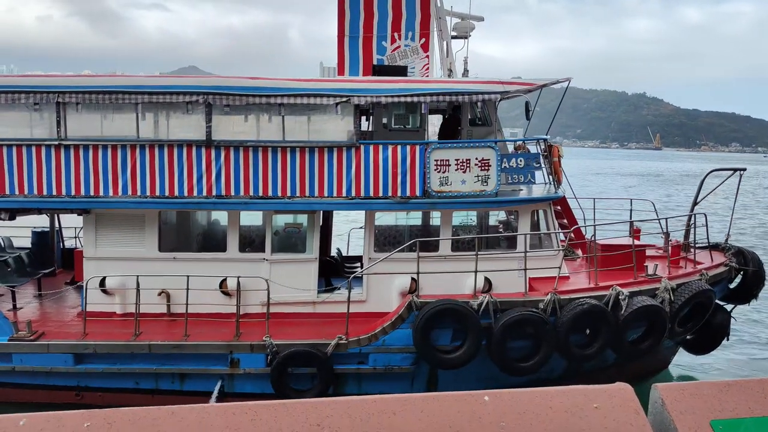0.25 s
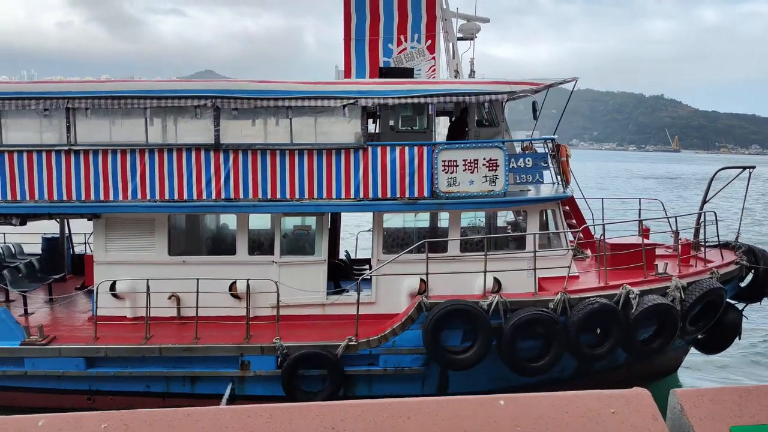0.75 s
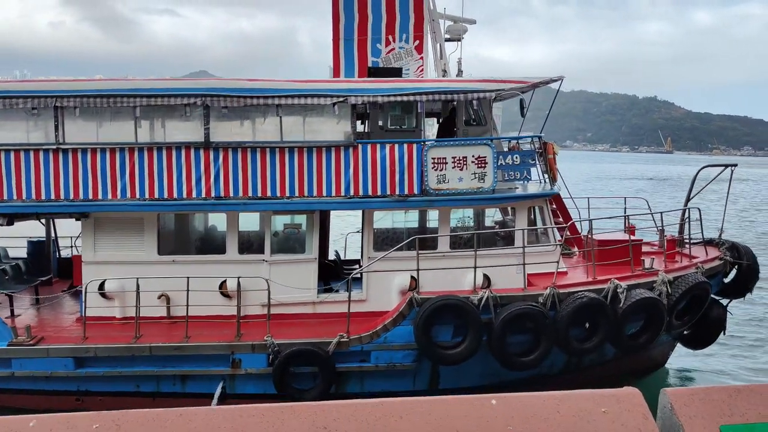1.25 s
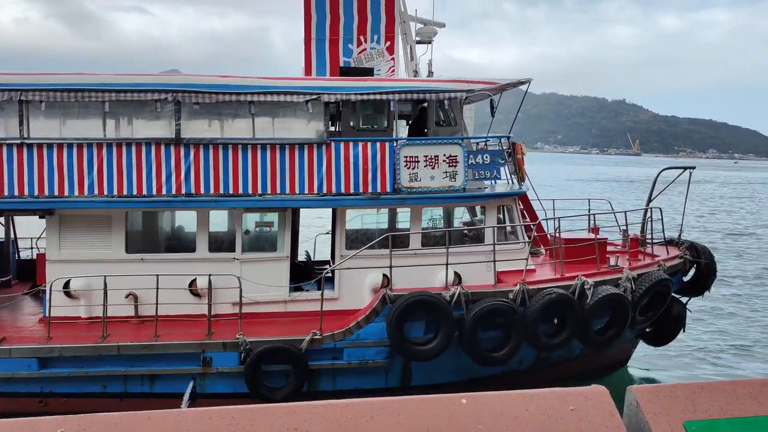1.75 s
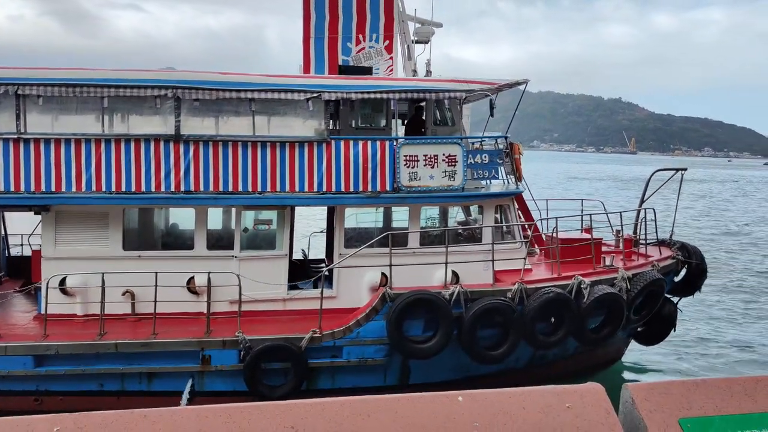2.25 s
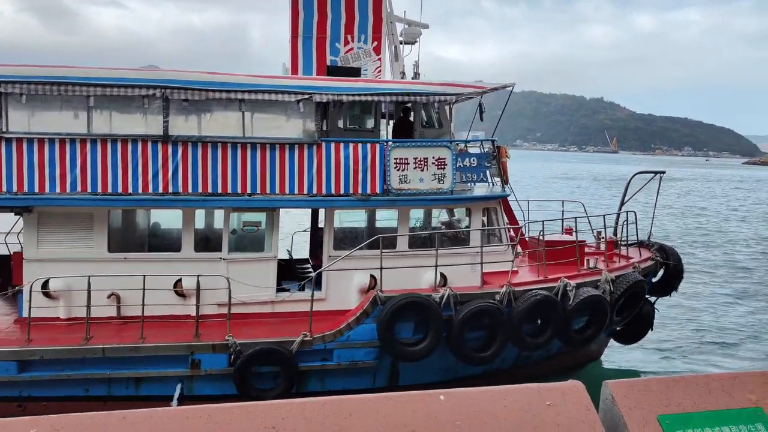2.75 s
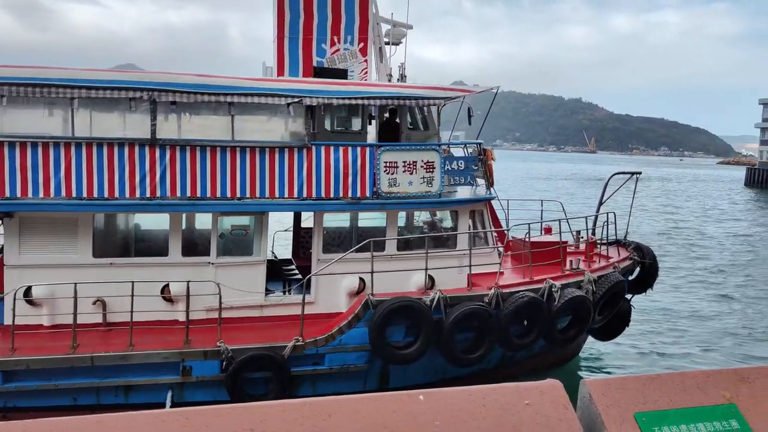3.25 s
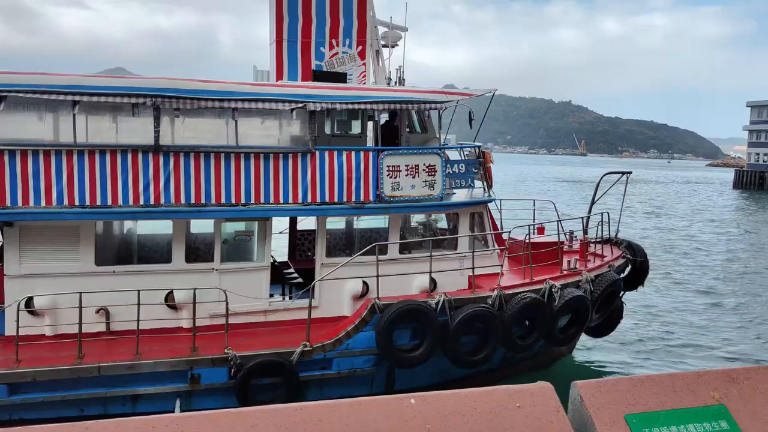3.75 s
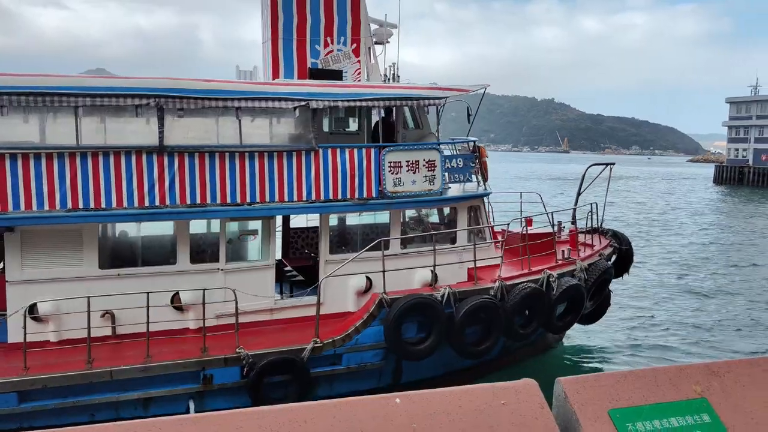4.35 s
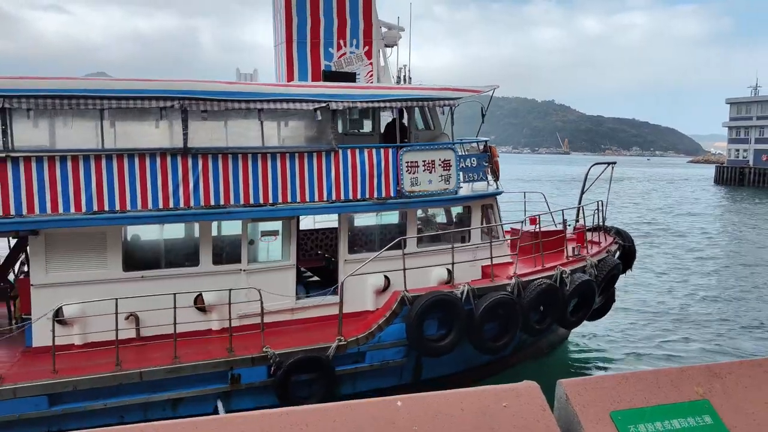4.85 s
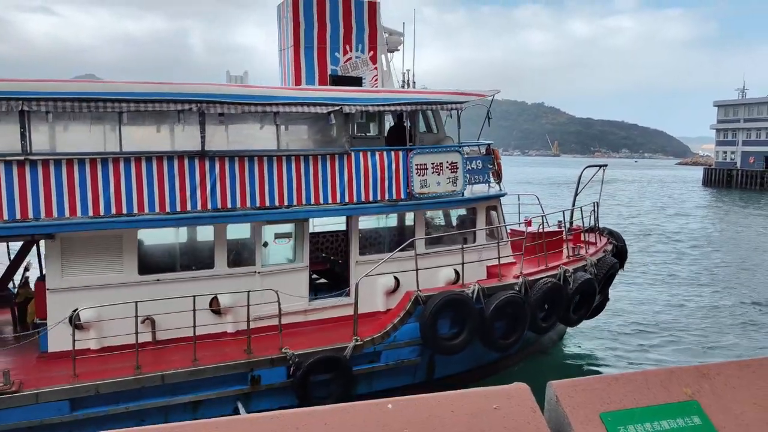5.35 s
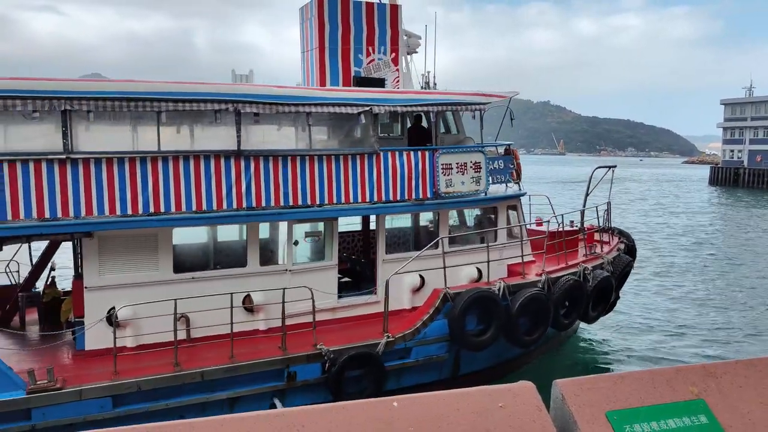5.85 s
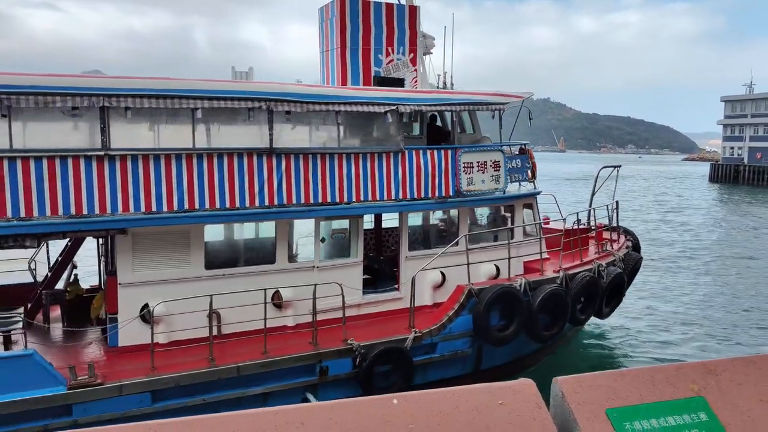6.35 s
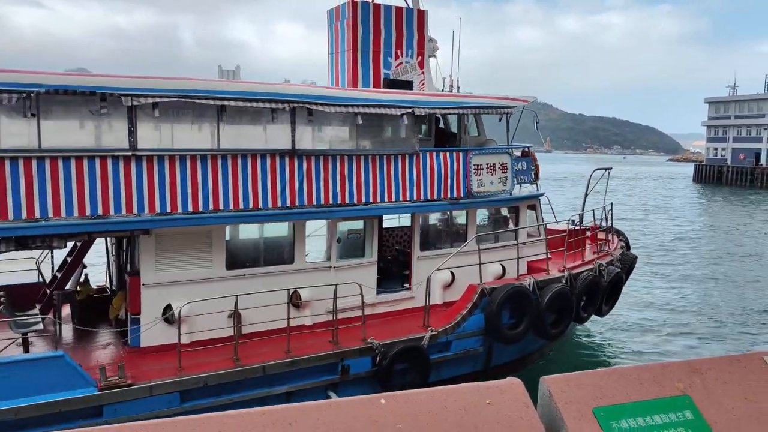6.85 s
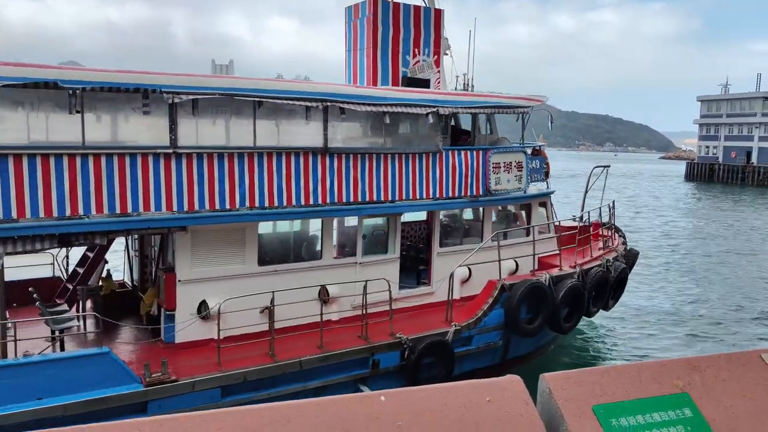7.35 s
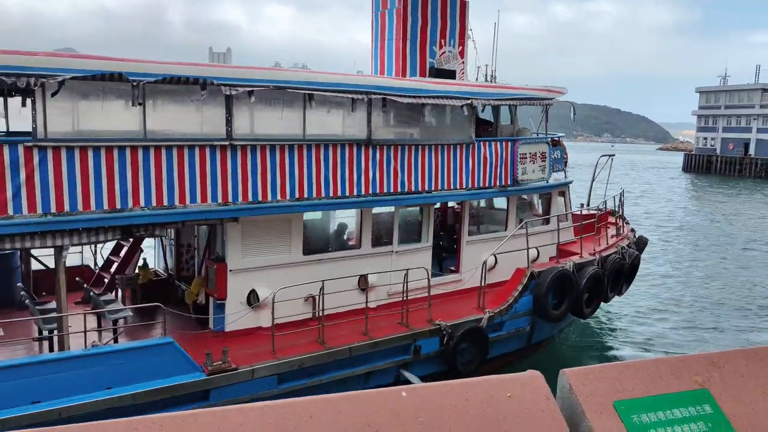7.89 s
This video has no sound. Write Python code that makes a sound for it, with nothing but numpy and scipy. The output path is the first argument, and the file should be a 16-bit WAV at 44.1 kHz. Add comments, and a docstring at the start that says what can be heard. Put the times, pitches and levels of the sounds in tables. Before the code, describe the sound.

Low, bassy boat-engine rumble with an uneven chugging pulse, speeding up a little as it leaves the quay, with faint water hiss and bubbling.

```python
"""A six-cylinder ferry diesel throbs and speeds up as the boat backs off a pier, heard from a phone on the
quay. Firing tones and weaker tones of unequal cylinders are sines locked to the crank; the generator hum and a
passing drone are wavering sines. Hull rumble, engine-room roar and water hiss are noise shaped in bands.
Bubbles and hollow rings are decaying sines that glide up; splashes are short bursts of filtered noise."""
import sys
import numpy as np
from scipy import signal
from scipy.fft import rfft, irfft, next_fast_len
from scipy.io import wavfile
from scipy.ndimage import uniform_filter1d

SR = 44100
rng = np.random.default_rng(int(sys.argv[2]) if len(sys.argv) > 2 else 0)


def unload_audio(sound):
    """Save the sound as a 16-bit wav file, at the path given as the first command line argument."""
    columns = np.transpose(np.atleast_2d(sound))
    # keep every value between -1 and 1, then stretch to whole-number steps
    steps = np.round(np.clip(columns, -1, 1) * 32767)
    wavfile.write(sys.argv[1], SR, steps.astype(np.int16))


N = 358091
T = np.arange(N) / SR

# Engine speed. Each row: time in seconds, firing rate in Hz.
FIRING_RATE = [(0, 60.9), (.8, 61.15), (1.3, 60.8), (2.5, 61.2), (2.95, 61.2), (3.2, 62.2), (3.55, 65.0),
               (3.85, 65.2), (4.6, 66.4), (4.95, 67.3), (5.4, 67.1), (5.95, 63.9), (6.55, 63.9),
               (7.2, 66.6), (7.8, 67.8), (8.12, 67.9)]
# Firing tones. Each row: time in seconds, firing tone in dB, then swell in dB of its
# 2nd and 3rd multiples together, its 4th, its 5th and its 6th.
FIRING_LEVELS = [(0, -17, 0.5, -10, -10.5, -14), (1, -19.5, 2, 3, -2.5, -4.5),
                 (1.5, -16.5, -2, -0.5, -18, -11.5), (2, -18, -4, 0, 1, -14.5),
                 (2.5, -18.5, 2.5, -3, 11, -8), (3.1, -19.5, -1.5, 4, -4, -7.5),
                 (3.5, -18.5, 0.5, 12, -10.5, 11.5), (4.1, -19.5, 3.5, -12.5, -11.5, -4),
                 (4.6, -17.5, 4, -2.5, -21, -3), (4.9, -23, 6.5, 12, -23, 19.5),
                 (5.2, -17.5, -7, 1, -16, 3), (5.6, -19.5, -2.5, -1, -19, 0.5),
                 (5.9, -19, 3.5, 4.5, 5.5, -19), (6.5, -17, 1, 11, -20, -11), (7.2, -16, -3, -3, -9.5, -13),
                 (7.7, -17.5, -8.5, 3.5, -11, -6), (8.12, -18, 6.5, 4, -8, 7)]
# Exhaust pipe resonances, one near each firing multiple from the 2nd up.
# Each row: centre in Hz, width in Hz, level in dB of the multiple at the centre.
PIPE_RESONANCES = [(118.85, 15.24, -23), (185.93, 14.5, -28.5), (241, 27, -40.5), (315.2, 16, -46),
                   (366, 24, -45)]
# Firing rates in Hz at which the speed-dependent settings below are given.
RATE_POINTS_HZ = [62, 64.9, 66.3]
# Lean of the firing pulse in rad, and scatter of the firing tone in dB, at each rate point.
LEAN_RAD, SCATTER_DB = [0.65, 1.6, 0.1], [1.5, 0.3, 0.25]
# Power by which the lean grows from multiple to multiple, at each rate point.
LEAN_POWER = [1.6, .8, 1]
# Tones of unequal cylinders, as multiples of the four-stroke cycle rate.
UNEVEN_ORDERS = [3, 4, 5, 7, 9, 11, 13, 15, 16, 17, 19, 20, 21, 22, 23, 25, 27, 28, 29, 33, 38, 40, 43]
# One row for each of those multiples: base level in dB at each rate point.
UNEVEN_LEVELS_DB = [(-37, -36, -35), (-50, -46, -50), (-50, -47, -46), (-46, -42, -43), (-49, -48, -49),
                    (-47, -38.5, -42), (-55, -47, -50), (-41, -50, -41), (-48, -44, -31.5),
                    (-52, -45, -44.5), (-46, -49, -47), (-58, -55, -53), (-53, -41, -39), (-60, -46, -42),
                    (-57, -53, -43), (-54, -58, -60), (-58, -49, -48), (-60, -56, -54), (-62, -58, -52),
                    (-58, -54, -52), (-56.5, -58, -53.5), (-55.5, -55, -57), (-56.5, -57, -59)]
# Swell of those tones. Each row: time in seconds, swell in dB.
BARK_SWELL = [(0, -0.5), (1.4, -0.5), (2.1, -0.5), (2.8, -2.5), (3.5, 0), (4.3, 0), (5, 3), (5.55, -1.5),
              (6.2, 3.5), (7.05, -4), (7.2, -1.5), (8.12, 1)]
# How far the barking tones stray out of step. Each row: time in seconds, spread in rad.
BARK_LOOSENESS = [(0, .9), (7.05, .9), (7.25, .15), (8.12, .15)]
# Generator hum. Each row: time in seconds, level in dB.
GENERATOR_LEVEL = [(0, -38), (1.3, -32), (2.1, -35), (3.3, -46), (4.6, -38), (5.2, -45), (6, -40), (7, -44),
                   (8.12, -43)]
# Hull rumble over time. Each row: time in seconds, level in dB.
RUMBLE_LEVEL = [(0, -46), (1.7, -46.5), (2.6, -42.5), (4.3, -40), (5.2, -38), (5.8, -40.5), (6.5, -41),
                (7.2, -44.5), (8.12, -41)]
# Churned water. Each row: time in seconds, hiss level in dB.
CHURN_LEVEL = [(0, -54), (.75, -54), (1.3, -57), (2.3, -54.5), (2.8, -55.5), (3.2, -54.5), (3.65, -50.5),
               (3.9, -53.5), (4.5, -53), (5.0, -47), (5.2, -50), (5.6, -47), (5.9, -50), (7.5, -55),
               (7.85, -53), (8.12, -53.5)]
# Noise spectra. Each row: frequency in Hz, relative density in dB per Hz.
RUMBLE_SHAPE = [(18, -18), (30, -3), (60, 6), (100, -7.5), (150, -8), (220, -9), (300, -10.5), (400, -10.5),
                (500, -12.5), (620, -20), (850, -34)]
ROAR_SHAPE = [(450, -3), (620, -3), (900, 0), (1150, -5.5), (1500, -13.5), (1900, -20), (2400, -51)]
HISS_SHAPE = [(1300, 2.5), (1900, -6), (2600, 0), (3200, -3.5), (3900, -4.5), (5300, -7), (6700, -9.5),
              (9000, -7.5), (11000, -5.5), (13000, -25.5)]
# Two microphone ports. Each row: frequency in Hz, likeness from 0 to 1, left minus right in dB, left lead in rad.
PORTS = [(60, 0.75, 0, 0.065), (230, 1, 0, 0.18), (348, 0.97, -1, 0.5), (444, 0.72, -1.5, 0.8),
         (874, 0.3, 0, 2.4), (1440, 0.45, -.5, 3.9), (2640, 0.3, 1.5, 6.9), (4530, 0.3, 3, 10),
         (7060, 0, 17, 12.), (8800, 0.25, -5, 12.5)]
# Sharp splashes. Each row: start in seconds, level in dB before filtering, left minus right in dB.
SPLASHES = [(.669, -41, 2), (1.15, -39, 17), (2.1167, -36, 7), (2.5202, -43, 8), (3.7943, -44, -7),
            (5.4886, -44, 9), (6.70, -34, -1)]
# A tone that swells for a while: start in seconds, end in seconds, pitch in Hz, level in dB.
DRONE = (2.5, 3, 375.5, -42.5)
# Hollow rings that sound briefly. Each row: start in seconds, peak in dB, starting pitch in Hz, decay in
# seconds, left minus right in dB.
HOLLOW_RINGS = [(2.915, -38.5, 372.5, 0.043, 4), (3.01, -44, 373, 0.014, 6), (3.059, -35, 258, 0.072, 5),
                (3.085, -45, 364, 0.031, -2), (3.165, -35, 373, 0.067, 3), (4.216, -28, 432, 0.013, -4),
                (5.003, -35, 415, 0.019, 3)]

CYLINDERS, CRANK_START_RAD = 6, -1.1
BARK_LAG_RAD, BARK_FROM_ORDER = 1.12, 10  # crank angle the bark trails by, lowest multiple in it
GENERATOR_HZ = 77.2
ROAR_DB, ROAR_DB_PER_CHURN_DB = -52, 0.24
SHELF_HZ, SHELF_DB, TOP_HZ = 7074, -20.5, 13500


def undb(db):
    """Gain of a level in dB."""
    return 10 ** (np.asarray(db) / 20)


def curves(table):
    """Columns of a table, after its time column, as values per sample."""
    s, *columns = np.transpose(table)
    return [np.interp(T, s, column) for column in columns]


def walk(rate):
    """Smooth random drift with about rate turns a second and spread near 1."""
    knots = rng.standard_normal(int(N / SR * 100) + 50)
    width = max(int(100 / rate), 1)
    slow = uniform_filter1d(uniform_filter1d(knots, width), width)
    return np.interp(T * 100, np.arange(len(slow)), slow / slow.std())


def pair(x, pan_db):
    """Sound on both channels, left minus right by pan_db."""
    return x * undb(np.array([[.5], [-.5]]) * pan_db)


def noise(shape, ref_hz, swell_db, flicker_db, flicker_rate):
    """Half-octave bands at both ports; they swell together and flicker alone; rms 1 above ref_hz before that."""
    size = next_fast_len(N)
    hz = np.maximum(np.arange(size // 2 + 1) * SR / size, 1)

    def on_hz(table, column):
        rows = np.array(table)
        return np.interp(np.log(hz), np.log(rows[:, 0]), rows[:, column])

    near, far = (rfft(rng.standard_normal(size)) * undb(on_hz(shape, 1)) for _ in range(2))
    alike = np.clip(on_hz(PORTS, 1), 0, 1)
    right = alike * near * np.exp(-1j * on_hz(PORTS, 3)) + np.sqrt(1 - alike ** 2) * far
    both = pair(np.array([near, right]), on_hz(PORTS, 2))
    power = np.sum(abs(both.mean(0)[hz > ref_hz]) ** 2) * 2
    both = both / np.sqrt(power) * size
    out, swell, half_octave = 0, walk(32.0), 2 * np.log2(hz)
    for k in range(int(2 * np.log2(shape[0][0])), int(2 * np.log2(shape[-1][0])) + 2):
        band = np.cos(np.pi / 2 * np.clip(half_octave - k, -1, 1)) ** 2
        gain = undb(swell_db * swell + flicker_db * walk(flicker_rate))
        out = out + irfft(both * band, size)[:, :N] * gain
    return out


def crank():
    """Angle in rad of the four-stroke cycle, in which every cylinder fires once."""
    return 2 * np.pi * np.cumsum(curves(FIRING_RATE)[0]) / SR / CYLINDERS + CRANK_START_RAD


def firing_tones(firing_hz, cycle):
    """Multiples of the firing rate keep near step to form a pulse; combustion scatter wavers size and phase."""
    tone_db, *swell_db = curves(FIRING_LEVELS)
    levels_db = [tone_db]
    for k, (mid_hz, width_hz, db) in enumerate(PIPE_RESONANCES):
        # a multiple fades as speed carries it off its pipe resonance
        detune = 2 * ((k + 2) * firing_hz - mid_hz) / width_hz
        levels_db.append(db + swell_db[max(k - 1, 0)] - 20 * np.log10(1 + detune ** 2))
    lean = np.interp(firing_hz, RATE_POINTS_HZ, LEAN_RAD) + .2 * walk(1.5)
    power = np.interp(firing_hz, RATE_POINTS_HZ, LEAN_POWER)
    scatter_db = np.interp(firing_hz, RATE_POINTS_HZ, SCATTER_DB) * walk(22.0)
    out = 0
    for k, db in enumerate(levels_db):
        waver_db = (.9 + .2 * k) * walk(4.0) + max(k - 2, 0) * .6 * walk(12.0)
        if k == 0:
            waver_db = waver_db + scatter_db
        phase = (k + 1) * CYLINDERS * cycle - lean * k ** power + (.15 + .06 * k) * walk(2.8)
        out = out + undb(db + waver_db) * np.cos(phase)
    return out


def uneven_tones(firing_hz, cycle):
    """One cylinder barks harder, so tones between throb once a cycle, sharply where they keep step."""
    bark_db, loose_rad = curves(BARK_SWELL)[0], curves(BARK_LOOSENESS)[0]
    out = 0
    for order, levels_db in zip(UNEVEN_ORDERS, UNEVEN_LEVELS_DB):
        db = bark_db + np.interp(firing_hz, RATE_POINTS_HZ, levels_db) + 1.4 * walk(3.5)
        in_bark = order >= BARK_FROM_ORDER
        stray = (loose_rad if in_bark else .3) * walk(.8)
        out = out + undb(db) * np.cos(order * (cycle - BARK_LAG_RAD * in_bark) + stray)
    return out


def diesel():
    """Crank-locked tones; the left port hears them later and the bearing wavers as the boat turns."""
    firing_hz = curves(FIRING_RATE)[0]
    cycle = crank() + 0.036 * walk(1.8)
    tones = np.sqrt(2) * (firing_tones(firing_hz, cycle) + uneven_tones(firing_hz, cycle))
    lag_samples = np.clip(13 + 4 * walk(1.2), 0, None)
    tilt = undb(.15 * walk(1.3))
    left = np.interp(np.arange(N) - lag_samples, np.arange(N), tones)
    return np.array([tilt * left, tones / tilt])


def generator():
    """A hum independent of the main engine: one sine wavering in pitch and level."""
    phase = 2 * np.pi * np.cumsum(GENERATOR_HZ + 0.68 * walk(0.61)) / SR
    level_db = curves(GENERATOR_LEVEL)[0] + 2.7 * walk(0.63)
    return pair(np.sqrt(2) * undb(level_db) * np.sin(phase), 0)


def wash():
    """Hull rumble, engine-room roar and hiss of churned water; the roar swells as the propeller bites."""
    churn_db = curves(CHURN_LEVEL)[0]
    roar_db = ROAR_DB + ROAR_DB_PER_CHURN_DB * (churn_db - churn_db.mean())
    rumble = undb(curves(RUMBLE_LEVEL)[0]) * noise(RUMBLE_SHAPE, 280, 0.2, 1.8, 14.0)
    roar = undb(roar_db) * noise(ROAR_SHAPE, 650, 0.5, 1.8, 18.0)
    hiss = undb(churn_db) * noise(HISS_SHAPE, 2400, 0.8, 1.1, 22.0)
    # rumble and roar puff with every firing and throb once a cycle
    puff = 1 + np.clip(.14 + .15 * walk(15.0), 0, 1) * np.cos(CYLINDERS * crank())
    throb = 1 + .07 * np.cos(crank() - BARK_LAG_RAD)
    return puff * throb * (rumble + roar) + hiss


def bubbles(count, level_db):
    """Bubbles burst at random in the wake, louder with churn; each decays over some twenty cycles, gliding up."""
    out, t = np.zeros((2, N + SR)), np.arange(SR // 8) / SR
    churn_db = curves(CHURN_LEVEL)[0]
    for when, pitch, size, side in rng.random((count, 4)):
        i, hz = int(when * N), 650.0 * 11.0 ** pitch
        envelope = np.exp(-t * hz / 22.0) * (1 - np.exp(-t / 0.0029))
        ring = envelope * np.sin(2 * np.pi * hz * t * (1 + 1.3 * t))
        db = churn_db[i] + level_db - 2.2 * np.log(size + .02)
        out[:, i:i + len(t)] += pair(undb(db) * ring, 16 * side - 6)
    return out[:, :N]


def splashes():
    """Short bursts of spray: band-passed noise that dies in milliseconds, separate at each port."""
    out, t = np.zeros((2, N + SR)), np.arange(SR // 5) / SR
    spray = signal.butter(2, [900, 3400], "bandpass", fs=SR, output="sos")
    for s, db, pan_db in SPLASHES:
        grit = rng.standard_normal((2, len(t)))
        burst = signal.sosfilt(spray, grit) * np.exp(-t / 0.0044)
        i = int(s * SR)
        out[:, i:i + len(t)] += pair(undb(db), pan_db) * burst
    return out[:, :N]


def drone():
    """A tone swells in and fades, wavering in level and phase."""
    start_s, end_s, hz, db = DRONE
    swell = np.clip(np.minimum(T - start_s, end_s - T) / 0.054 + .5, 0, 1)
    tone = np.sin(2 * np.pi * hz * T + 0.3 * walk(2.8))
    return pair(np.sqrt(2) * swell * undb(db + 3.2 * walk(8.2)) * tone, 0)


def hollow_rings():
    """Each ring is a decaying sine that glides up."""
    out, t = np.zeros((2, N + SR)), np.arange(SR // 5) / SR
    for s, db, hz, decay_s, pan_db in HOLLOW_RINGS:
        envelope = (1 - np.exp(-4 * t / decay_s)) * np.exp(-t / decay_s)
        ring = envelope * np.sin(2 * np.pi * hz * t * (1 + 0.16 * t))
        i = int(s * SR)
        out[:, i:i + len(t)] += pair(2 * undb(db) * ring, pan_db)  # 2: the envelope peaks near one half
    return out[:, :N]


def scene():
    """All sources at the two ports."""
    engines = diesel() + generator()
    water = wash() + bubbles(count=900, level_db=-8.0) + splashes()
    return engines + water + drone() + hollow_rings()


def record(dry):
    """The phone drops its treble by a step and cuts the top."""
    low = signal.sosfiltfilt(signal.butter(10, SHELF_HZ, fs=SR, output="sos"), dry)
    stepped = low + undb(SHELF_DB) * (dry - low)
    return signal.sosfilt(signal.ellip(8, .2, 70, TOP_HZ, fs=SR, output="sos"), stepped)


dry = scene()
out = record(dry)
unload_audio(out)
```